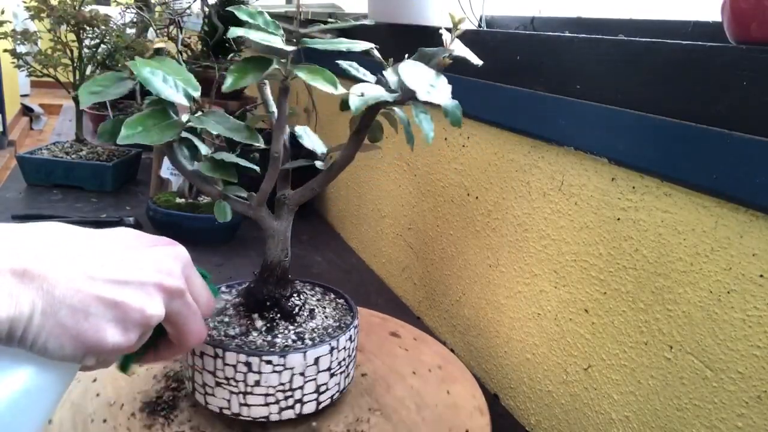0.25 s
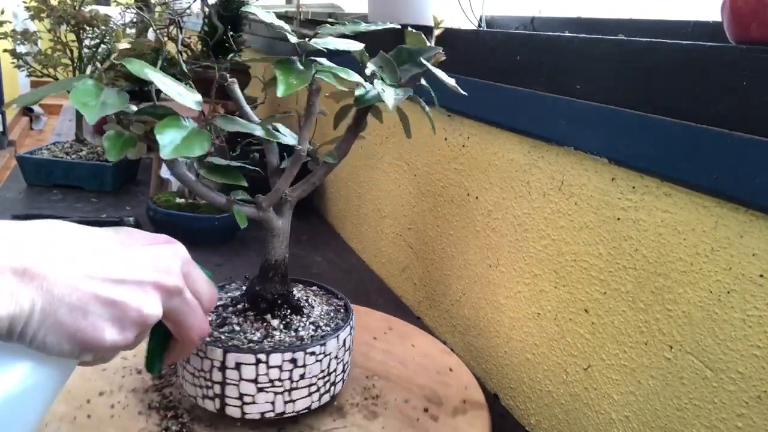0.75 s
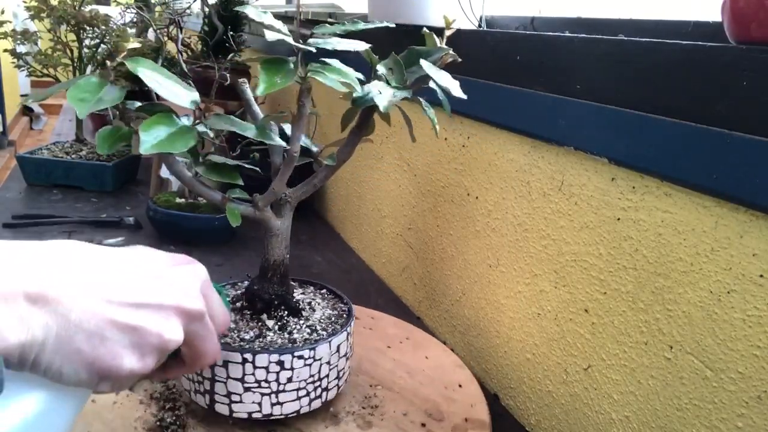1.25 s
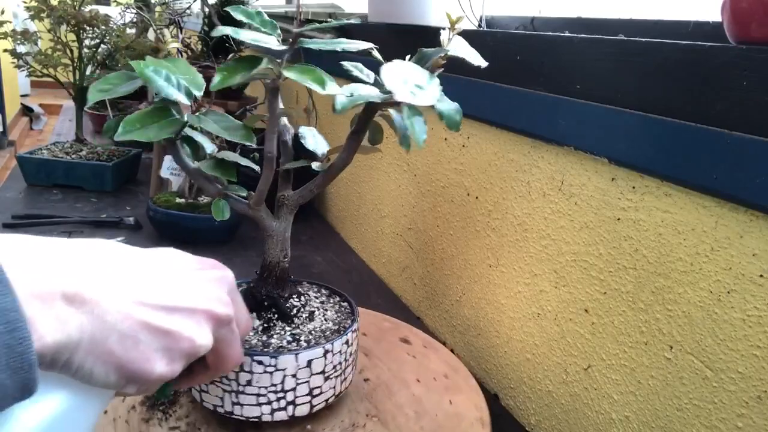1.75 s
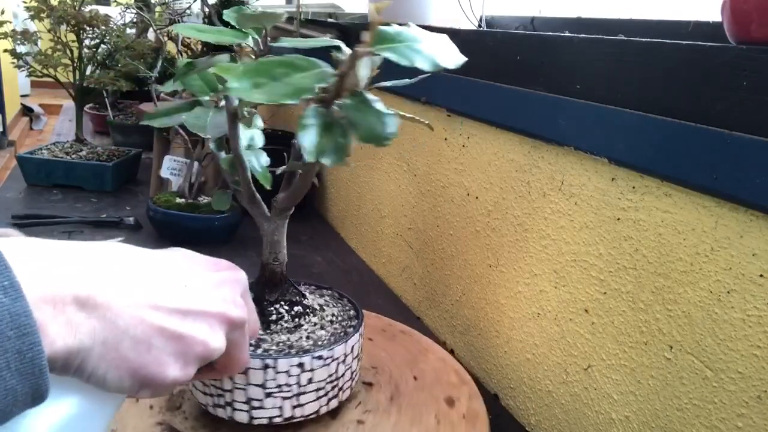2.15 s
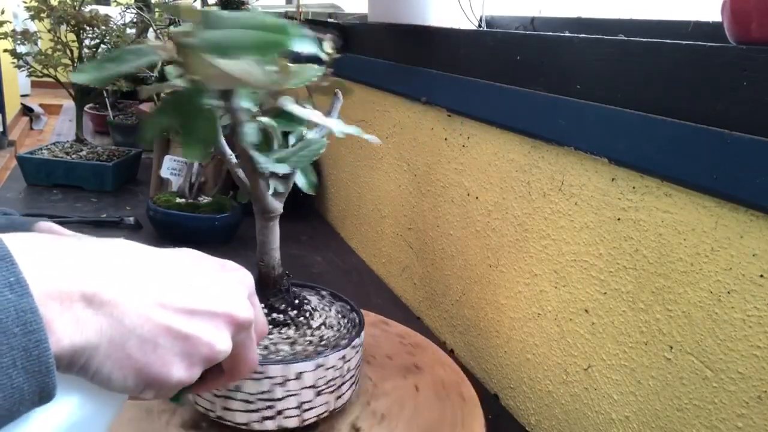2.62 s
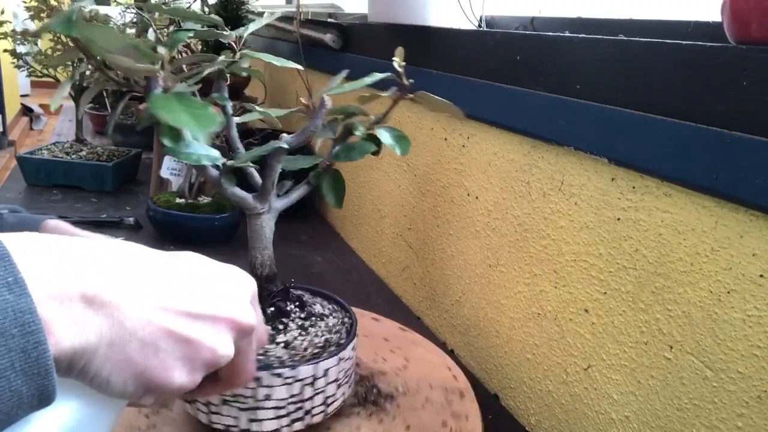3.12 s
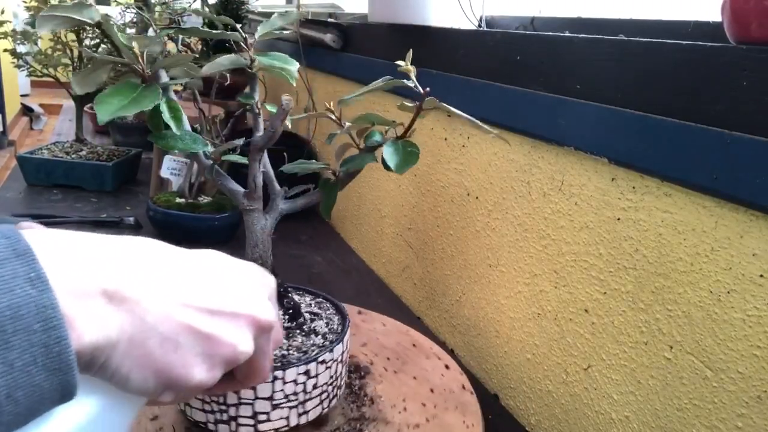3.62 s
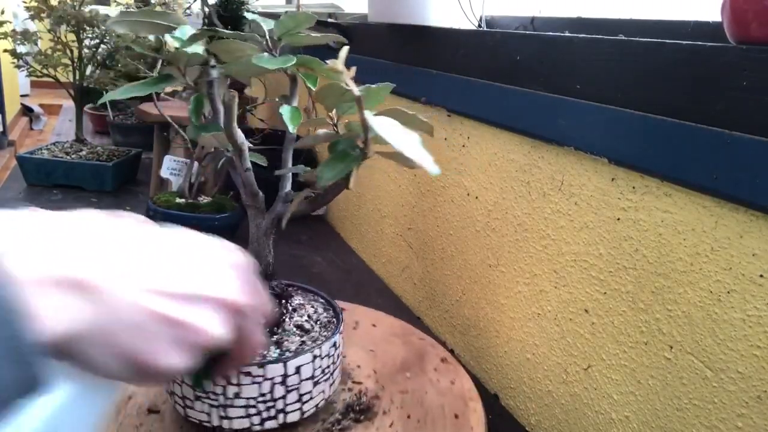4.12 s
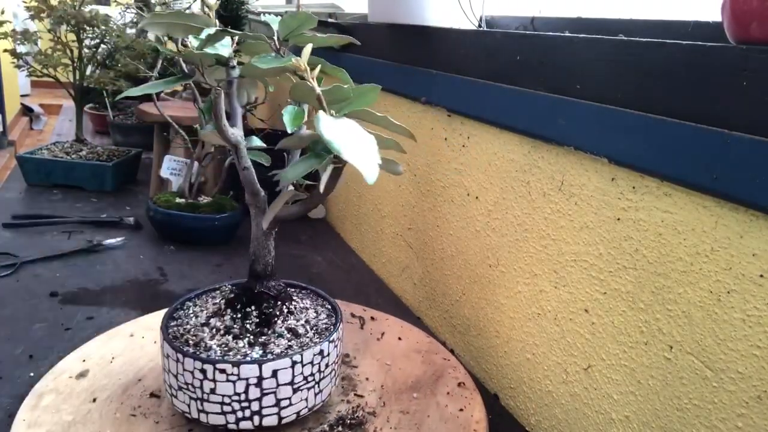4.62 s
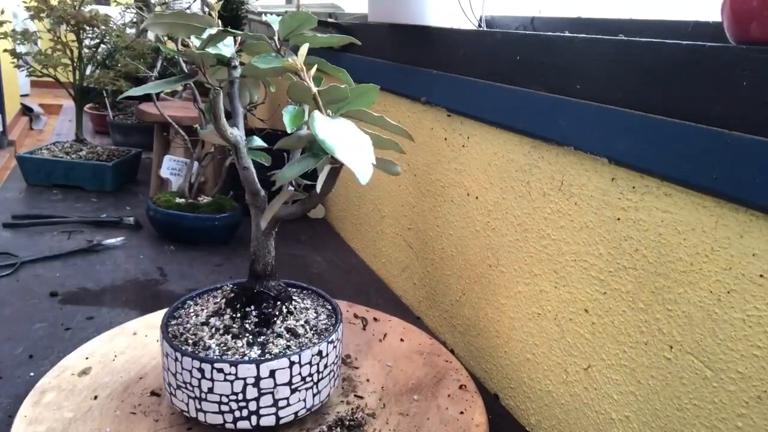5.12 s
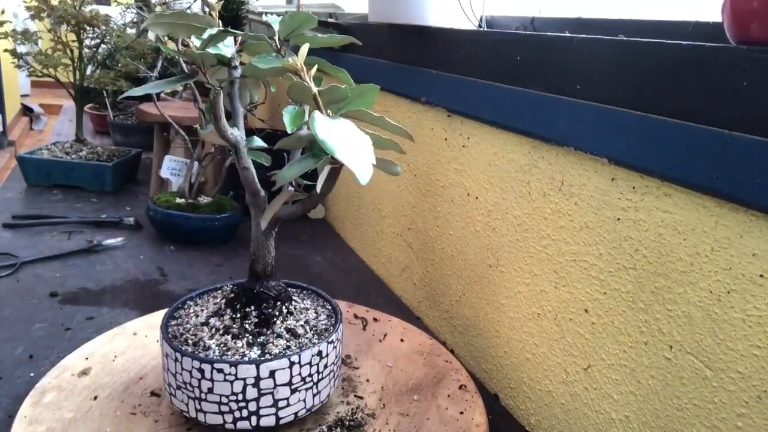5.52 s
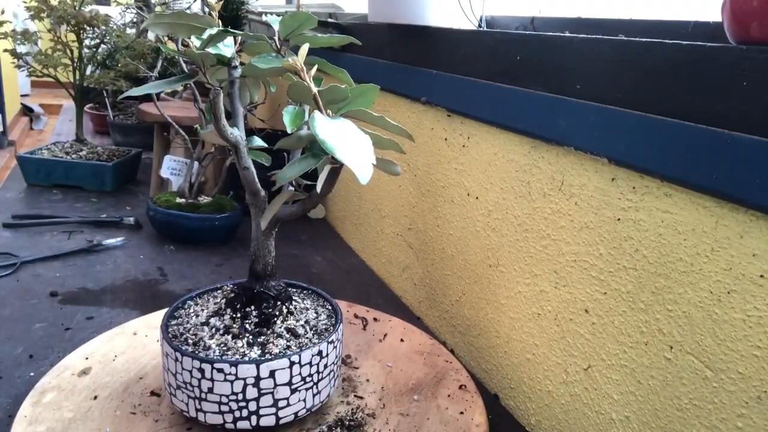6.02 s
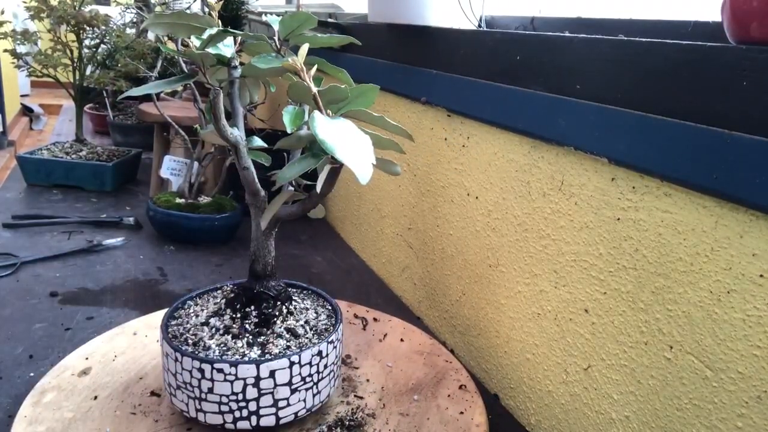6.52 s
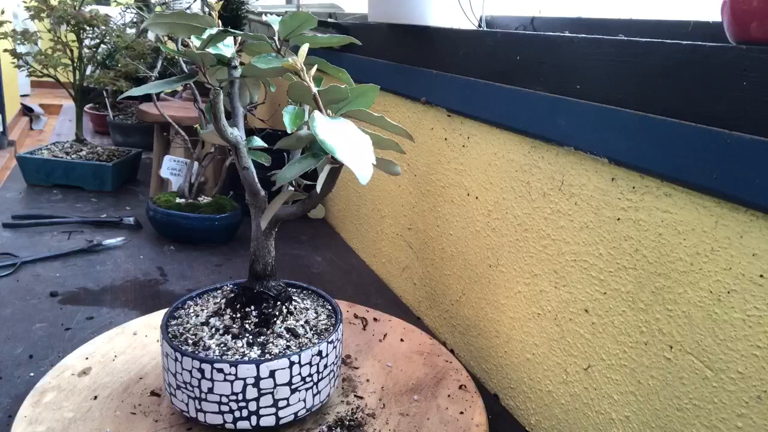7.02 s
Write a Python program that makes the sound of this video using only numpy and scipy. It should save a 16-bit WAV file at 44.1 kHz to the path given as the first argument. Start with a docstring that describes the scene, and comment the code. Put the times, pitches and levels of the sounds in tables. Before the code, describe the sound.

Close up, a hand pumps a trigger spray bottle about twenty times at wet potting soil: short breathy hisses, each with hard plastic clicks and a faint refill suck. Some jets squelch, and dull plops fall between. At about five seconds it stops; a sleeve rustles and the bottle is set down with a loud hollow knock on a wooden bench, in quiet outdoor air.

```python
"""Outdoors by a wooden bench, someone pumps a trigger spray bottle twenty times at the soil of a potted tree.
Each squeeze is a swell of hissing noise and a faint suck of refill; hard plastic clicks ring the pump housing.
Some jets squelch in the wet soil as gliding resonances of noise; small blips, a drip and a tick join in.
A few dull plops fall in between, made of short taps whose highs arrive first.
Then a sleeve brushes past as swells of noise, and the bottle is put down with knocks that ring it and the bench."""
import sys
import numpy as np
from scipy import signal
from scipy.io import wavfile
from scipy.ndimage import uniform_filter1d, map_coordinates

SR = 44100
rng = np.random.default_rng(int(sys.argv[2]) if len(sys.argv) > 2 else 0)


def pcm_store(signal):
    """Save signal as 16-bit PCM."""
    levels = np.round(np.clip(np.atleast_2d(signal), -1, 1) * 32767)
    wavfile.write(sys.argv[1], SR, levels.astype(np.int16).T)


N = 320166  # length in samples
TIME = np.arange(N) / SR  # s

# Squeezes of the trigger: start t/s, length/s, relative level/dB
STROKES = [(-0.06, 0.15, -35), (0.257, 0.16, -36), (0.581, 0.15, -37), (0.899, 0.16, -36.5),
           (1.226, 0.14, -36), (1.545, 0.13, -36.5), (1.846, 0.12, -36), (2.144, 0.13, -37),
           (2.407, 0.11, -37), (2.624, 0.096, -37), (2.809, 0.094, -37.5), (3.057, 0.15, -35.5),
           (3.374, 0.16, -37), (3.666, 0.13, -35.5), (3.932, 0.12, -36), (4.148, 0.09, -38),
           (4.36, 0.11, -35.5), (4.571, 0.1, -36.5), (4.793, 0.1, -36), (4.974, 0.095, -37.5)]
# Blows of the bottle on the bench, relative levels: t/s, crack/dB, boom/dB, ring of the bottle/dB
KNOCKS = [(5.71, -55, -34, -67), (5.7624, -29.5, -37, -32.5), (6.2131, -18.5, -18.5, -37),
          (6.234, -26.5, -21, -44), (6.281, -36, -38, -52), (6.835, -47, -43, -56)]


def amp(db):
    """Turns decibels into a gain."""
    return 10 ** (np.asarray(db) / 20)


def unit(x):
    """Scales a sound to rms 1."""
    return x / np.sqrt(np.mean(x ** 2) + 1e-20)


def add(mix, s, sound):
    """Mixes a sound in at time s, cutting off whatever runs past the end."""
    start = max(round(s * SR), 0)
    part = mix[start:][:len(sound)]
    part += sound[:len(part)]


def noise(spectrum, size=N):
    """Noise of rms 1 with a given spectrum, falling away below its lowest point."""
    hz, db = np.transpose(spectrum)
    f = np.fft.rfftfreq(size, 1 / SR) + 1e-3  # just above 0 so that the log exists
    gain = amp(np.interp(np.log(f), np.log(hz), db)) * np.minimum(f / hz[0], 1) ** 2
    random_phase = np.exp(2j * np.pi * rng.random(len(f)))
    return unit(np.fft.irfft(gain * random_phase, size))


def fade(t, t60):
    """Dies away by 60 dB in t60 seconds."""
    return np.exp(-np.log(1000) * t / t60)


def ring(modes, t):
    """Struck modes, each a sine dying at its own speed, with alternating signs."""
    out = np.zeros(len(t))
    for k, (hz, db, t60) in enumerate(modes):
        out += (-1) ** k * amp(db) * fade(t, t60) * np.sin(2 * np.pi * hz * t)
    return out


def whistle(hz, width):
    """Noise of rms 1 in a narrow resonance that follows a pitch curve."""
    r = np.exp(-np.pi * width / SR)
    a, b = rng.standard_normal((2, 2 * len(hz)))
    # slow random wandering; the first half only lets the filter settle
    wander = signal.lfilter([1], np.poly([r, r]), a + 1j * b)[len(hz):]
    carrier = np.exp(2j * np.pi * np.cumsum(hz) / SR)
    return unit((wander * carrier).real)


def swell(peak_s, rise_s, fall_s):
    """A rounded swell of height 1, down to a tenth rise_s before its peak and fall_s after it."""
    t = TIME - peak_s
    distance = np.maximum(-t / rise_s, t / fall_s)
    return 1 / np.cosh(np.minimum(np.arccosh(10) * distance, 20))


def pressure(s, length):
    """One squeeze: the pressure builds, holds and lets go."""
    # in shares of the squeeze: when it is half up or half down, and how gently it turns there
    press_at, press_ease, release_at, release_ease = 0.077, 0.077, 0.9, 0.092
    u = (TIME - s) / length
    build = .5 * (1 + np.tanh(.5 * (u - press_at) / press_ease))
    let_go = .5 * (1 - np.tanh(.5 * (u - release_at) / release_ease))
    return build * let_go


def spray(mist_db=1.5, suck_db=-55.5, sputter_db=0.9, gurgle_db=4.5):
    """Pressure pushes out a hissing jet in each squeeze; then the pump sucks in fresh water."""
    # Spectrum of the jet: f/Hz, relative level/dB per Hz
    mist_spectrum = [(120, -6.5), (290, -8.5), (390, 3), (480, -5.5), (620, -0.5), (850, -2.5), (980, 0.5),
                     (2000, -1), (2600, 2), (2930, -1.5), (3300, 1.5), (4000, 2.5), (4700, -2.5),
                     (6000, -0.2), (9000, -3), (15000, -3)]
    # Spectrum of the water drawn up the tube: f/Hz, relative level/dB per Hz
    suck_spectrum = [(300, -16), (1000, 5), (1500, -0.5), (1750, 7.5), (2400, 2.5), (5000, 3), (6700, 0),
                     (9000, -15), (16000, -67.5)]
    # Level of the jet's treble: t/s, level/dB
    treble_level = [(0, -1.5), (1.4, 0), (2.4, 0), (3.5, -2), (5, -3)]
    bounce_s, bounce_gain, sway = 0.00077, 0.13, 0.049  # sway: random spread, as a share of the delay
    refill_at, refill_rise, refill_fall = 1.075, 1, 1.08  # in shares of the squeeze's length

    jet, refill = np.zeros(N), np.zeros(N)
    for s, length, db in STROKES:
        jet += amp(db) * pressure(s, length)
        refill += swell(s + refill_at * length, refill_rise * length, refill_fall * length)

    flutter = unit(uniform_filter1d(rng.standard_normal(N), size=130))  # uneven break-up into droplets
    hiss = noise(mist_spectrum)
    # the pot reflects the hiss over a path that changes a little with every squeeze
    path = 1 + sway * rng.standard_normal(len(STROKES))
    delay = bounce_s * np.interp(TIME, np.transpose(STROKES)[0], path)
    hiss = hiss + bounce_gain * map_coordinates(hiss, [(TIME - delay) * SR])
    treble = signal.lfilter(*signal.butter(1, 5500, "high", fs=SR), hiss)
    hiss = hiss + (amp(np.interp(TIME, *np.transpose(treble_level))) - 1) * treble

    mist = amp(mist_db + sputter_db * flutter) * jet * hiss
    suck = amp(suck_db + gurgle_db * flutter) * refill * noise(suck_spectrum)
    return mist + suck


def snap(t, t60=0.018, tail_db=-21, tail_t60=0.24):
    """A bright crack of hard plastic: noise with a fast fade and a faint, longer tail."""
    # Spectrum of the crack: f/Hz, relative level/dB per Hz
    snap_spectrum = [(300, -4), (1500, -20.5), (2200, -10), (2700, -13), (3300, -4), (4300, -4.5),
                     (5100, 0.5), (6900, -2), (7700, -4.5), (12000, -4.5), (16000, -9)]
    return noise(snap_spectrum, size=len(t)) * (fade(t, t60) + amp(tail_db) * fade(t, tail_t60))


def click(t, housing_db, spread=0.036, uneven_db=3.0):
    """A snap that rings the pump housing, striking its modes a little differently each time."""
    # Modes of the pump housing before the random spread: f/Hz, relative level/dB, t60/s
    housing = [(546, -12, 0.089), (726, -15.5, 0.04), (1050, -11, 0.011), (1326, -1.5, 0.039),
               (1550, -8.5, 0.0085), (1730, -3.5, 0.048), (2223, -6, 0.026), (2350, -6, 0.033)]
    modes = []
    for hz, db, t60 in housing:
        struck_hz = hz * (1 + spread * rng.standard_normal())
        modes.append((struck_hz, db + uneven_db * rng.standard_normal(), t60))
    return snap(t) + amp(housing_db) * ring(modes, t)


def trigger(click_db=-6, ring_db=-8, rebound_ring_db=-6, rattle_db=-28):
    """The trigger clicks and rebounds; valve and spring tick in each refill; it rattles loosely at each knock."""
    # Clicks at the ends of the trigger's play: t/s, relative level/dB, strength of the rebound (0-1)
    click_rows = [(.176, -32.5, 0.1), (.192, -26.5, 0.2), (.239, -25, 0.88), (.5053, -33, 0),
                  (0.5217, -25.5, 0.1), (.568, -35.5, 0), (.82, -26, .5), (.872, -30.5, 0.1),
                  (1.1367, -28.5, 0.1), (1.1639, -25, 0), (1.2005, -25, 1), (1.4548, -33, 0.1),
                  (1.517, -25.5, 1), (1.8205, -23, 0.5), (2.1237, -35.5, 0), (2.379, -31.5, 0.1),
                  (2.389, -25.5, .45), (2.594, -26, 0), (2.6071, -23, 0.8), (2.791, -24, 1),
                  (3.0326, -27, 0.77), (3.3491, -28.5, 1), (3.6238, -29.5, 0.04), (3.91, -33, 0.2),
                  (4.131, -23, 0.87), (4.3321, -30, 0), (4.3453, -24, .2), (4.78, -30.5, 0.4),
                  (4.9625, -24.5, 1), (5.1385, -28.5, 0.3), (5.171, -30, 0.34)]
    rebound_s = .0058  # from a click to its rebound
    valve_at, valve_scatter_s, valve_db = 1.26, .003, -45.5  # valve_at in shares of the squeeze
    stray_from, stray_to, stray_db = 1.3, 1.9, -49  # spring tick: earliest and latest share of the squeeze

    out, t = np.zeros(N), TIME[:4096]
    for s, db, rebound in click_rows:
        add(out, s, amp(db + click_db) * click(t, ring_db))
        add(out, s + rebound_s, rebound * amp(db + click_db) * click(t, rebound_ring_db))
    for s, length, _ in STROKES:
        valve_s = s + valve_at * length + valve_scatter_s * rng.standard_normal()
        add(out, valve_s, amp(valve_db) * snap(t))
        add(out, s + rng.uniform(stray_from, stray_to) * length, amp(stray_db) * snap(t))
    for s, crack_db, _, _ in KNOCKS:
        add(out, s, amp(crack_db + rattle_db) * snap(t))
    return out


def squelches(fall=.39, hollow_db=-1, squeal_db=-1, sag=0.042):
    """The jet digs a wet hollow that deepens, so its resonances fall; the hard-pressed nozzle squeals."""
    # Squelches, relative levels: t/s, length/s, hollow level/dB, starting pitch f/Hz, nozzle squeal/dB
    squelch_rows = [(0.016, 0.039, -37, 2340, -33), (3.118, 0.055, -38, 2200, -52),
                    (3.144, 0.043, -49, 2260, -40.5), (3.711, 0.057, -39, 2823, -43.5),
                    (4.372, 0.055, -39, 2513, -44), (4.814, 0.045, -39, 2840, -39.5)]
    # Resonances of the hollow: multiple of its pitch, width/Hz, relative level/dB
    hollow_modes = [(.52, 60, -6), (0.707, 45, 0), (1.001, 46, 4), (1.25, 300, -1.5), (2.098, 500, -7)]
    # Resonances of the nozzle: f/Hz halfway through, width/Hz, relative level/dB
    nozzle_modes = [(5610, 900, -1.5), (6800, 260, -6), (7900, 700, -3)]
    out = np.zeros(N)
    for s, length, db, hz, nozzle_db in squelch_rows:
        u = np.linspace(0, 1, int(length * SR))  # progress from start to end
        hollow = sum(amp(d) * whistle(hz * k * (1 - fall * u), width) for k, width, d in hollow_modes)
        squeal = sum(amp(d) * whistle(f * (1 - sag * (u - .5)), width) for f, width, d in nozzle_modes)
        both = amp(db + hollow_db) * unit(hollow) + amp(nozzle_db + squeal_db) * unit(squeal)
        add(out, s, signal.windows.tukey(len(u), .5) * both)
    return out


def blips(rise=.85, linger=0.24, linger_t60=0.086, rough=0.51):
    """Each wet blip swells and dies, fluttering, as it slides down to a low note that lingers briefly."""
    # Blips: t/s, relative level/dB, time constant of the glide/s
    blip_rows = [(0.803, -37, .0011), (5.14, -34.5, 0.00248)]
    from_hz, to_hz = 2380, 590
    out, t = np.zeros(N), TIME[:3000]
    for s, db, glide in blip_rows:
        hz = to_hz + (from_hz - to_hz) * np.exp(-t / glide)
        u = t / (rise * glide)
        height = u * np.exp(1 - u) + linger * (1 - np.exp(-u)) * fade(t, linger_t60)
        flutter = 1 + rough * unit(uniform_filter1d(rng.standard_normal(len(t)), size=60))
        add(out, s, amp(db) * height * flutter * np.sin(2 * np.pi * np.cumsum(hz) / SR))
    return out


def drip(rise_s=0.00062, sag=25):
    """A last drop pips briefly, a sine sinking in pitch at a rate of sag per second."""
    # The drop: t/s, level/dB, starting pitch f/Hz
    drop = (5.215, -41.5, 3480)
    out, t = np.zeros(N), TIME[:1000]
    s, db, hz = drop
    height = t / rise_s * np.exp(1 - t / rise_s)
    pip = np.sin(2 * np.pi * np.cumsum(hz * np.exp(-sag * t)) / SR)
    add(out, s, amp(db) * height * pip)
    return out


def tick(t60=0.014):
    """One thin, dry tick: a fast-fading burst of noise with no body under it."""
    # The tick: t/s, starting level/dB
    tick_row = (5.5935, -33.5)
    # Its spectrum: f/Hz, relative level/dB per Hz
    thin_spectrum = [(3000, -10), (4200, 5), (6000, 3), (8000, 1), (12000, -13), (16000, -20)]
    out, t = np.zeros(N), TIME[:2048]
    s, db = tick_row
    add(out, s, amp(db) * noise(thin_spectrum, size=len(t)) * fade(t, t60))
    return out


def plops(travel_s=0.00391, at_hz=900, lead_s=0.00289, echo_s=0.00839, echo_gain=0.21, tail_db=-7, tail_t60=0.22):
    """Dull taps that disperse like bending waves in a board: the highs arrive first, the thud last."""
    # Plops: t/s, peak level of the tap/dB
    plop_rows = [(3.375, -39.5), (3.449, -25), (3.579, -26.5), (3.673, -35), (4.043, -22.5), (4.151, -28.5),
                 (4.221, -39), (4.312, -35.5), (4.677, -41.5)]
    # Spectrum of a tap: f/Hz, relative level/dB
    plop_spectrum = [(40, -22), (110, 2), (200, 5), (330, 2.5), (550, -3), (900, 8.5), (1100, -1.5),
                     (1350, -26), (2000, -40), (4000, -70)]
    t, f = TIME[:8192], np.fft.rfftfreq(8192, 1 / SR)
    hz, db = np.transpose(plop_spectrum)
    # the delay is travel_s at at_hz and shrinks with the square root of frequency
    turns = 2 * travel_s * np.sqrt(at_hz * f)
    gain = amp(np.interp(f, hz, db)) * np.minimum(f / hz[0], 1)
    tap = np.fft.irfft(gain * np.exp(-2j * np.pi * turns))
    tap, out = tap / abs(tap).max(), np.zeros(N)
    for s, peak_db in plop_rows:
        scatter = rng.standard_normal(len(t)) * fade(t, tail_t60)
        tail = amp(tail_db) * signal.fftconvolve(tap, scatter / np.linalg.norm(scatter))[:len(t)]
        add(out, s - lead_s, amp(peak_db) * tap)
        add(out, s - lead_s + echo_s, amp(peak_db) * (echo_gain * tap + tail))
    return out


def knocks(crack_db=-3, crack_t60=0.061, tail_db=-19, tail_t60=0.51, boom_db=-6, shell_db=-1, lag_s=0.0035):
    """The bottle's base cracks on the wood and its shell rings; the heavy bench answers a moment later."""
    # Spectrum of the crack: f/Hz, relative level/dB per Hz
    crack_spectrum = [(150, 13.5), (450, 1), (750, 10), (1000, 3), (1350, 4), (2000, 0.5), (2900, -4.5),
                      (4000, -20), (6000, -15.5), (9000, -35), (16000, -38)]
    # Modes of the bottle's shell: f/Hz, relative level/dB, t60/s
    shell = [(793, -1, .07), (1225, -4.5, 0.16), (1310, -7, 0.035), (1810, -11, 0.15), (2650, -15, .1),
             (4030, -2.5, 0.041)]
    # Modes of the bench: f/Hz, relative level/dB, t60/s
    bench = [(43.3, -15, 0.36), (78, -2, 0.23), (131, -6, 0.2), (146.2, -5, 0.31), (176, 5, 0.1),
             (216, 1, 0.13), (270, 1, 0.11), (318.5, -5.5, 0.15), (405, -7.5, 0.14), (556, -11.5, 0.44),
             (740, -16, 0.097)]
    out, t = np.zeros(N), TIME[:24000]
    for s, hard_db, heavy_db, ring_db in KNOCKS:
        crack = noise(crack_spectrum, size=len(t)) * (fade(t, crack_t60) + amp(tail_db) * fade(t, tail_t60))
        add(out, s, amp(hard_db + crack_db) * crack + amp(ring_db + shell_db) * ring(shell, t))
        add(out, s + lag_s, amp(heavy_db + boom_db) * ring(bench, t))
    return out


def rumbles():
    """The bench rumbles in swells of low noise as the bottle settles."""
    # Rumbles: peak t/s, level/dB, rise/s, fall/s
    rumble_rows = [(6.27, -36.5, 0.036, 0.16), (6.45, -43.5, 0.045, .2), (6.855, -44, 0.044, .09)]
    # Their spectrum: f/Hz, relative level/dB per Hz
    rumble_spectrum = [(30, -27), (80, 9), (110, -23), (145, 4.5), (210, -2.5), (280, -8.5), (450, -13.5),
                       (900, -26.5), (3000, -44)]
    level = sum(amp(db) * swell(s, rise, fall) for s, db, rise, fall in rumble_rows)
    return level * noise(rumble_spectrum)


def sleeve(gain_db=1, grain_db=1):
    """Cloth fibres rub in soft, slightly grainy swishes of noise."""
    # Strokes of the sleeve: peak t/s, relative level/dB, rise/s, fall/s
    swish_rows = [(5.78, -47, 0.09, 0.14), (5.96, -52.5, .5, 0.21), (6.19, -48.5, 0.18, 0.26),
                  (6.5, -54, 0.1, 0.67), (6.831, -41.5, 0.19, 0.15)]
    # Spectrum of the cloth: f/Hz, relative level/dB per Hz
    cloth_spectrum = [(300, -11), (500, -9), (800, -4), (1200, -3), (2000, -5), (3000, -3), (4200, -5.5),
                      (6500, -13), (9000, -22.5), (16000, -28)]
    grain = unit(uniform_filter1d(rng.standard_normal(N), size=300))
    power = sum((amp(db) * swell(s, rise, fall)) ** 2 for s, db, rise, fall in swish_rows)
    return np.sqrt(power) * amp(gain_db + grain_db * grain) * noise(cloth_spectrum)


def surroundings(x, wet_db=-19, t60=0.47):
    """Adds a few close echoes and a faint, short tail of scattered sound."""
    # Echoes from bench and wall: delay/s, gain
    echo_rows = [(.0027, 0.092), (.0046, 0.12), (.0091, 0.2), (0.0146, .08)]
    t = TIME[:12000]
    tail = rng.standard_normal(len(t)) * fade(t, t60) * (t > .01)
    response = amp(wet_db) * tail / np.linalg.norm(tail)
    response[0] = 1  # the direct sound
    for delay, gain in echo_rows:
        add(response, delay, np.array([gain]))
    return signal.oaconvolve(x, response)[:N]


def air(level_db=-55):
    """The steady outdoor background: mostly low noise."""
    # Spectrum of the background: f/Hz, relative level/dB per Hz
    air_spectrum = [(15, -57), (25, -21), (70, -7.5), (87, -0.5), (108, -3.5), (157, -4.5), (263, -11.5),
                    (335, -11), (384, -13), (516, -15.5), (560, -16), (962, -28), (6740, -38), (16000, -43)]
    return amp(level_db) * noise(air_spectrum)


def scene(width_db=-25):
    """Everything sits in the centre; a faint left-right difference is made from the spray's treble."""
    mist = spray()
    bottle = surroundings(mist + trigger() + squelches() + blips() + drip() + tick())
    mid = bottle + plops() + knocks() + rumbles() + sleeve() + air()
    treble = signal.sosfilt(signal.butter(12, 4700, "high", fs=SR, output="sos"), mist)
    scatter = rng.standard_normal(200)
    side = amp(width_db) * signal.oaconvolve(treble, scatter / np.linalg.norm(scatter))[:N]
    return np.array([mid + side, mid - side])  # left, right


def record(dry, low_cut_hz=28, high_cut_hz=15850):
    """Takes away the deepest lows and, steeply, the highest treble."""
    thinned = signal.sosfilt(signal.butter(2, low_cut_hz, "high", fs=SR, output="sos"), dry)
    high_cut = signal.firwin(401, high_cut_hz, window=("kaiser", 8), fs=SR)
    return signal.oaconvolve(thinned, high_cut[None], "same", axes=1)


dry = scene()
out = record(dry)
pcm_store(out)
```